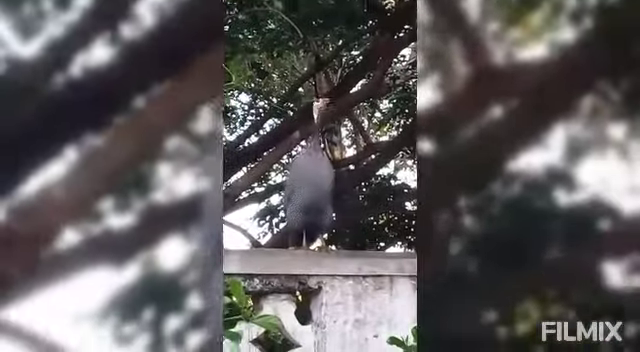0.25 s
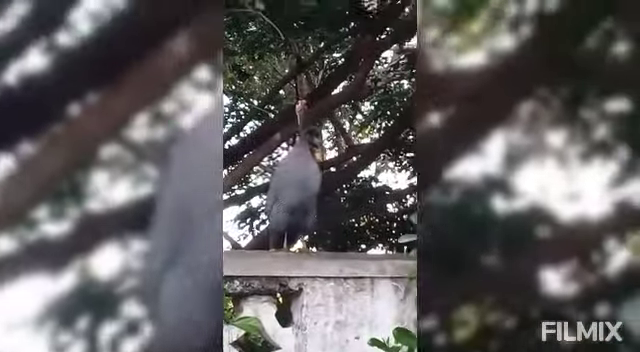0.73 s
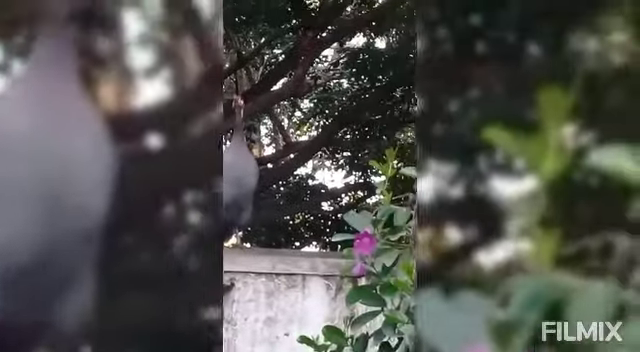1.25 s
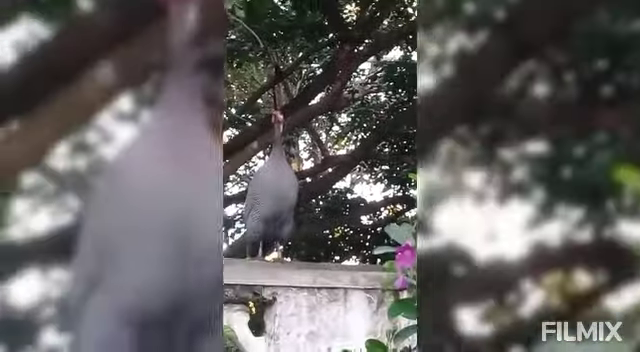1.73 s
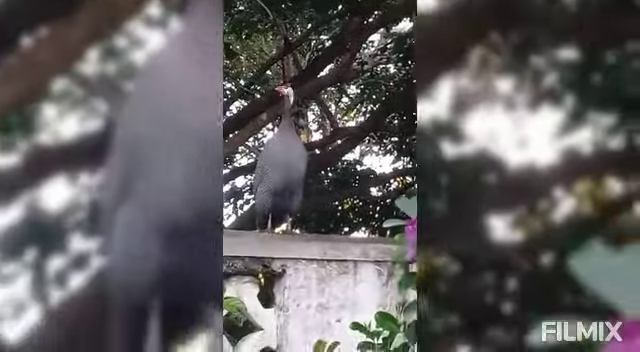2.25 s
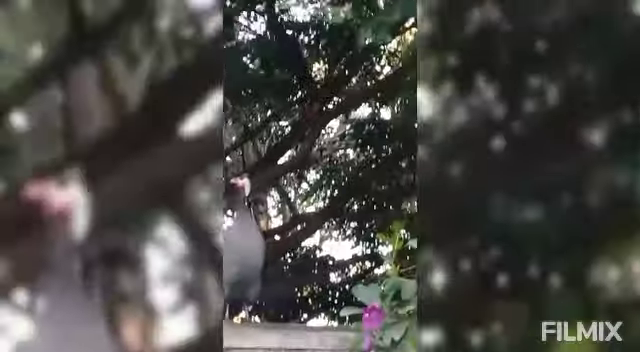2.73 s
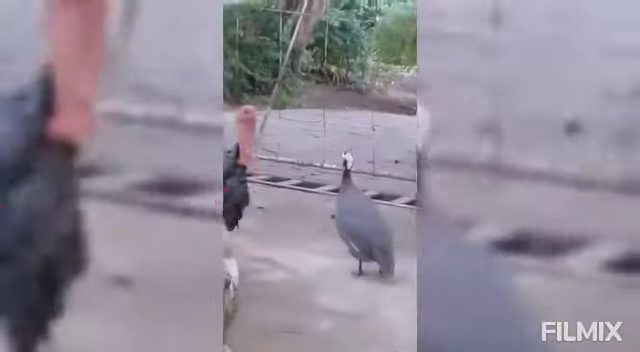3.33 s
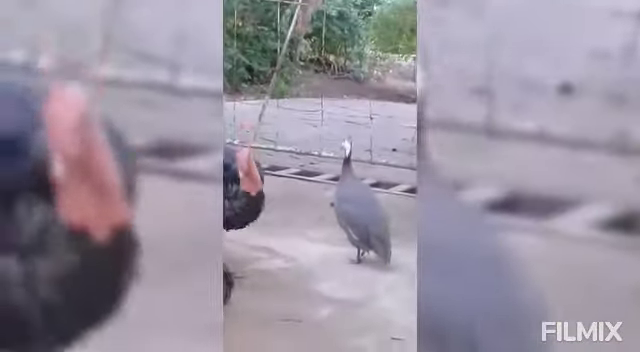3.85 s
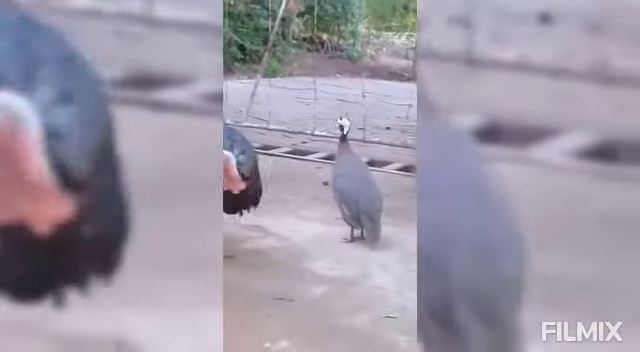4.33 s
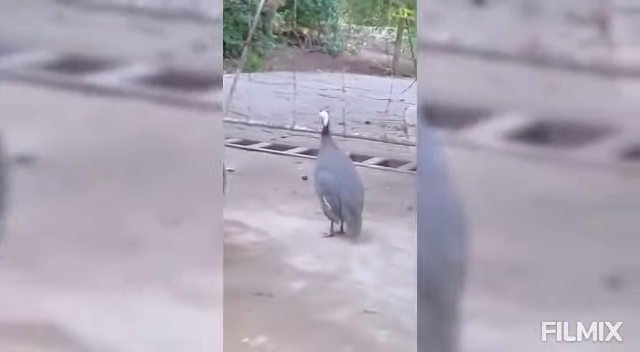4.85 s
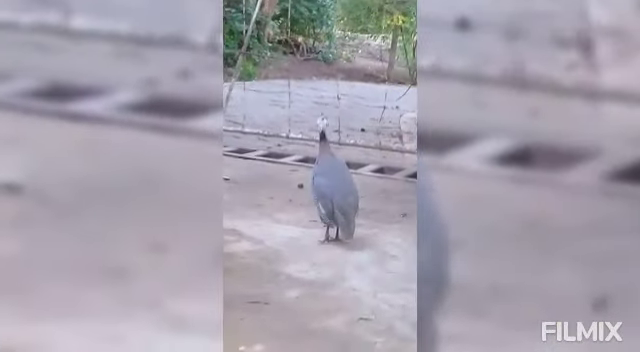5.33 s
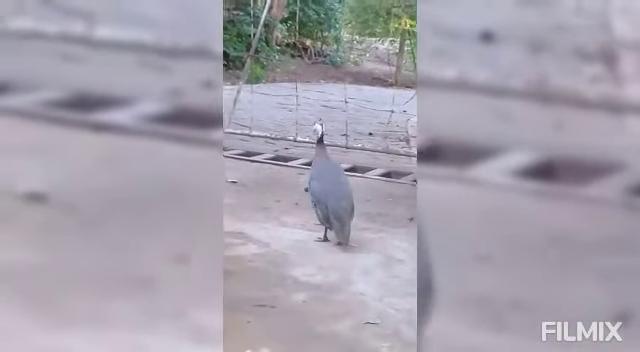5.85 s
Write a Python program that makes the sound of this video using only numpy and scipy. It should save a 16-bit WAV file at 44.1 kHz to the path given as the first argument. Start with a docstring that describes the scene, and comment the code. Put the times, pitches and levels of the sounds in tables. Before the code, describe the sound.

Harsh squealing guineafowl cackles stop abruptly, leaving light scuffs, a sharp click, distant chirps, a few soft turkey yelps and low wind gusts.

```python
"""Over a murmur of leaves, insect hiss and a faint breeze, a guineafowl on a garden wall gives five harsh
cackles: a rasp of pulses buzzing in its throat, most of them led in by a whistled squeal. Gritty scuffs follow,
small birds start whistling and chirping far off, and a sharp click snaps close by. The garden crossfades to a
yard, where a turkey yelps softly among a few light taps. Towards the end, gusts of wind rumble on the
microphone."""
import sys
import numpy as np
from scipy import signal
from scipy.fft import rfft, irfft, next_fast_len
from scipy.io import wavfile
from scipy.ndimage import uniform_filter1d

SR = 44100
rng = np.random.default_rng(int(sys.argv[2]) if len(sys.argv) > 2 else 0)


def transcribe(signal):
    """Save signal, clipped to [-1, 1], as a 16-bit WAV file at the path in sys.argv[1]."""
    frames = np.atleast_2d(signal).T
    limited = np.clip(frames, -1, 1)
    pcm = np.round(limited * 32767).astype(np.int16)
    wavfile.write(sys.argv[1], SR, pcm)


N = 268569
T = np.arange(N) / SR

# EQ curves of the noise beds: f/Hz, level/dB
GARDEN_EQ = [(90, -33.5), (150, -1.5), (339, -0.5), (562, -13.5), (861, -16.5), (1100, -21.5),
             (2230, -13.5), (2930, -21.5), (3920, -36), (4940, -23), (6000, -20), (8350, -35), (15500, -39)]
YARD_EQ = [(90, -41), (150, -4.5), (366, -6), (573, -19), (861, -18), (1320, -22.5), (2460, -18.5),
           (3920, -20.5), (4660, -17), (6000, -20), (9380, -39), (10700, -34.5), (15500, -33)]
INSECT_EQ = [(5800, -25.5), (6600, -0.5), (7300, 1.5), (7750, -4), (8300, -23.5)]
WIND_EQ = [(12, -57.5), (20, -23), (81, 1), (140, -6), (236, -19), (404, -38), (441, -31), (475, -42),
           (700, -55.5), (910, -83), (1540, -120)]
# fader curve of the breeze: t/s, level/dB
BREEZE_FADER = [(0, -62), (3.4, -61), (4.6, -59.5), (5.0, -61.5), (5.4, -53), (5.65, -36), (6.09, -41)]
# gusts on top of the breeze: crest t/s, length/s, level/dB
WIND_GUSTS = [(3.139, 0.077, -49), (3.659, 0.31, -52.5), (3.709, 0.15, -42.5), (3.872, 0.059, -43.5),
              (3.98, 0.18, -52.5), (4.235, 0.1, -45), (4.442, 0.097, -49.5), (4.55, .1, -51.5),
              (4.73, 0.05, -56), (5.084, 0.16, -41.5), (5.178, .1, -46), (5.253, 0.029, -34.5),
              (5.491, 0.041, -35.5), (5.63, 0.19, -35), (5.736, 0.14, -34), (5.952, 0.091, -35.5)]
# the cackles' low, pulsed voice, the first already under way: t/s, length/s, time to crest/s, pitch/Hz,
# level/dB, brightness/dB, throat resonance/Hz, beak resonance/Hz, presence around 4 kHz/dB
RASPS = [(-.08, 0.13, 0.073, 320.5, -17.5, 2.5, 1880, 4420, 4.5),
         (.292, 0.059, .035, 316, -25.5, 1.5, 1500, 4750, -7.5),
         (.458, .16, 0.11, 345.7, -18.5, 3.5, 1874, 4460, 7.5),
         (.888, .064, .038, 322, -26.5, 3.5, 1480, 4624, -9),
         (1.06, .126, .029, 319.1, -19.5, -2, 2071, 4510, -0.5)]
# EQ curve of the throat and open beak: f/Hz, level/dB
THROAT_EQ = [(250, -11.5), (330, -17), (650, -18), (1000, -10.5), (1350, -7.5), (1750, 4), (2500, -8),
             (3400, -10.5), (4500, -14), (5200, -10.5), (6000, -20), (7200, -34.5), (9300, -48),
             (11500, -32.5), (15500, -28)]
# sharp fixed peaks that colour the cackle: f/Hz, width/Hz, lift/dB
CACKLE_PEAKS = [(2080, 130, -1.5), (2099, 110, 2), (2530, 240, 6.5), (2930, 110, 12.5), (3360, 76, 6.5),
                (3960, 34, 15), (5720, 200, 5.5)]
# the high voice opening a cackle, soft creak or loud squeal: t/s, length/s, rise/s, first f/Hz, top f/Hz,
# level/dB, ducking under the rasp/dB, second partial/dB, third partial/dB, scratch/0-1
SQUEAL_NOTES = [(.218, 0.096, .02, 1320, 1392, -45.5, 0.5, 4, 5, 0.7),
                (.29, 0.05, 0.024, 1575, 1540, -28, -13, -19, -13, 1),
                (.449, 0.1, 0.017, 1598, 1655, -18, -18.5, -18, -9, 0.85),
                (.843, 0.044, 0.02, 1060, 1128, -46.5, 2.5, -0.5, -5.5, 0.2),
                (.886, .062, .022, 1420, 1500, -30, -11, -9.5, -11, 0.5),
                (1.036, .13, .036, 1378, 1556, -18, -25, -19, -21, 0.39)]
# slapback from wall and trunks: delay/s, level/dB
SLAP_ECHOES = [(.019, -17), (.052, -21)]
# scuffs on wall and ground: t/s, level/dB, low edge/Hz, high edge/Hz, t60/s
SCUFF_HITS = [(1.288, -46, 1498, 2952, 0.64), (1.301, -54, 272, 1191, 0.48), (1.321, -51, 4303, 6000, 0.27),
              (1.551, -53.5, 318, 850, 0.36), (1.985, -65.5, 904, 4974, 0.99),
              (2.49, -41.5, 713, 2400, 0.38), (2.617, -41, 680, 2440, 0.3), (2.7, -58.5, 401, 904, 1.4),
              (2.822, -54, 1360, 2730, 0.83), (2.886, -49.5, 1330, 3000, 0.25),
              (5.313, -55, 1790, 4430, 0.19), (5.713, -56, 800, 4025, 0.29)]
# light taps: t/s, level/dB, low edge/Hz, high edge/Hz
TAP_HITS = [(4.383, -40.5, 692, 1900), (4.595, -52.5, 2200, 3500), (5.581, -55.5, 696, 2630),
            (5.931, -62, 846, 1200)]
# far birds' held whistles: t/s, length/s, first f/Hz, last f/Hz, level/dB
BIRD_WHISTLES = [(1.717, 0.074, 1758, 1710, -65.5), (2.198, 0.2, 1883, 1800, -61.5),
                 (2.995, .029, 3290, 3330, -53), (3.08, 0.11, 1752, 1700, -69.5),
                 (4.016, .29, 1440, 1564, -61), (4.4, .5, 1546, 1505, -76.5),
                 (4.618, 0.19, 3247, 3526, -59.5)]
# far birds' falling chirps: t/s, length/s, first f/Hz, level/dB
BIRD_CHIRPS = [(2.221, 0.108, 3210, -56.5), (2.445, 0.096, 3055, -52.5), (3.238, .1, 3080, -56.5),
               (3.51, 0.12, 3100, -63), (3.751, .07, 3614, -60.5), (4.2, 0.15, 3000, -57.5),
               (4.372, 0.088, 3860, -55.5), (4.741, 0.095, 3394, -58.5), (5.397, 0.07, 3466, -60)]
# small hard clicks close by: t/s, strike level/dB
CLICK_HITS = [(2.3741, -22), (2.8697, -42.5)]
# modes that a click rings: f/Hz, level/dB, t60/s
CLICK_RING = [(2670, -51, 0.0041), (4700, 4.5, 0.0039), (6780, -1, 0.0052), (12970, -18, .001)]
# turkey yelps: t/s, length/s, pitch/Hz, level/dB, octave partial/dB
TURKEY_YELPS = [(3.812, 0.083, 1063, -44.5, -32), (3.949, .019, 1073, -37, -39),
                (5.151, .095, 1034, -48, -20), (5.285, 0.034, 1059, -44.5, -18),
                (5.358, 0.02, 1046, -44, -11)]


def from_db(db):
    """Decibels to gain."""
    return 10 ** (np.asarray(db) / 20)


def rms_one(x):
    """Normalise to unit rms."""
    return x / np.sqrt(np.mean(x ** 2) + 1e-20)


def ramp(t, length):
    """Linear fade from zero to one."""
    return np.clip(t / length, 0, 1)


def drift(rate_hz):
    """Smooth random modulator of unit rms."""
    r = np.exp(-2 * np.pi * rate_hz / SR)
    return rms_one(signal.lfilter([1], [1, -2 * r, r * r], rng.standard_normal(N + SR))[SR:])


def phase_of(hz):
    """Running phase of a moving pitch."""
    return 2 * np.pi * np.cumsum(hz) / SR


def latest(rows):
    """At every sample: time since the latest cue, its length (cut at the next cue), its other columns."""
    rows = np.array(rows)
    starts = rows[:, 0]
    lengths = np.minimum(rows[:, 1], np.diff(starts, append=np.inf))
    cue = np.maximum(np.searchsorted(starts, T, "right") - 1, 0)
    return [T - starts[cue], lengths[cue], *rows[cue, 2:].T]


def band(x, low_hz, high_hz, order=2):
    """Butterworth band-pass."""
    edges = [low_hz, np.clip(high_hz, low_hz * 1.1, SR * .45)]
    return signal.sosfilt(signal.butter(order, edges, "band", fs=SR, output="sos"), x)


def colour(x, eq):
    """Apply an EQ curve that rolls off beyond its ends; unit rms."""
    hz, db = np.transpose(eq)
    size = next_fast_len(N)
    f = np.maximum(np.fft.rfftfreq(size, 1 / SR), 1)
    gain = from_db(np.interp(np.log(f), np.log(hz), db))
    roll_off = np.minimum(1, np.minimum(f / hz[0], hz[-1] / f)) ** 3
    return rms_one(irfft(rfft(x, size) * gain * roll_off, size)[:N])


def resonate(x, hz, width_hz):
    """A resonance with unity gain at its centre."""
    r = np.exp(-np.pi * width_hz / SR)
    feedback = [1, -2 * r * np.cos(2 * np.pi * hz / SR), r * r]
    return signal.lfilter((1 - r * r) / 2 * np.array([1, 0, -1]), feedback, x)


def glide_resonate(x, hz, width_hz):
    """A swept resonance: shift its centre to zero, smooth, shift back."""
    turn, r = np.exp(1j * phase_of(hz)), np.exp(-np.pi * width_hz / SR)
    return 2 * np.real(turn * signal.lfilter([1 - r], [1, -r], x / turn))


def in_yard(midpoint_s=2.91, fade_s=.5):
    """Crossfade: zero in the garden, one in the yard."""
    return np.clip((T - midpoint_s) / fade_s + .5, 0, 1)


def outdoors(garden_db=-61.5, yard_db=-64):
    """A distant bed of leaves and air, first in the garden, then in the yard."""
    garden = from_db(garden_db) * colour(rng.standard_normal(N), GARDEN_EQ)
    yard = from_db(yard_db) * colour(rng.standard_normal(N), YARD_EQ)
    return np.sqrt(1 - in_yard()) * garden + np.sqrt(in_yard()) * yard


def insects(garden_db=-71, yard_db=-66, throb_db=1.5, period_s=.331, crest_s=4.15, waver_db=2.2):
    """Many far insects merge into one throbbing band of hiss, louder in the yard."""
    db = garden_db + (yard_db - garden_db) * in_yard()
    throb = np.cos(2 * np.pi * (T - crest_s) / period_s)
    return from_db(db + throb_db * throb + waver_db * drift(6)) * colour(rng.standard_normal(N), INSECT_EQ)


def wind(evenness=.94, flutter_db=3):
    """Low turbulence on the microphone: a fluttering breeze with bell-shaped gusts on top."""
    eddies = colour(rng.standard_normal(N), WIND_EQ)
    eddy_power = uniform_filter1d(eddies ** 2, size=SR // 20) + 1e-6
    compressed = rms_one(eddies / eddy_power ** (evenness / 2))
    breeze_db = np.interp(T, *np.transpose(BREEZE_FADER))
    power = from_db(breeze_db + flutter_db * drift(14)) ** 2
    for crest, length, db in WIND_GUSTS:
        bell = np.cos(np.pi * np.clip((T - crest) / length, -.5, .5))
        power += (from_db(db) * bell) ** 2
    return np.sqrt(power) * compressed


def rasp_source(hz, rough, jitter=.02, wander=.014, shimmer=.55, breath_db=-5):
    """The syrinx fires uneven pulses, each with a puff of turbulence; returns sound and phase."""
    phase = phase_of(hz * (1 + jitter * rough * drift(150) + wander * drift(25)))
    samples_since_pulse = np.mod(phase / (2 * np.pi), 1) * SR / hz
    pulses = np.sinc(samples_since_pulse - 2) * (samples_since_pulse < 4)
    pulses = rms_one(pulses - pulses.mean()) * (1 + shimmer * rough * drift(120))
    breath = band(rng.standard_normal(N), 900, 18000, order=1)
    puffs = rms_one(breath * (1 + .5 * np.cos(phase - 1)))
    return pulses + from_db(breath_db) * rough * puffs, phase


def rasp(attack_s=.034, release_s=.033, swell_db_per_s=85.5, sag_db_per_s=116.5):
    """Pulses ring in the guineafowl's throat and beak, brighter with effort; returns sound and phase."""
    t, length, crest, pitch_hz, level_db, bright_db, throat_hz, beak_hz, presence_db = latest(RASPS)
    t = np.minimum(t, length)
    gate = ramp(t, attack_s) * ramp(length - t, release_s)
    effort_db = -np.maximum(swell_db_per_s * (crest - t), sag_db_per_s * (t - crest))
    db = level_db + effort_db
    scoop = .05 * np.exp(-t / .022)   # pitch and throat start low, the beak high, then all settle
    droop = 3.9 * np.maximum(t - .66 * length, 0)   # the pitch falls over the last third
    rough = 1 - .5 * ramp(np.minimum(t, length - t), .055)   # roughest at both ends
    pulses, phase = rasp_source(pitch_hz * (1 - scoop - droop), rough)
    voice = colour(pulses, THROAT_EQ)
    voice += sum((from_db(lift) - 1) * resonate(voice, hz, width) for hz, width, lift in CACKLE_PEAKS)
    voice += from_db(-2) * glide_resonate(voice, throat_hz * (1 - scoop), width_hz=220)
    voice += (from_db(presence_db + .62 * effort_db) - 1) * resonate(voice, 4000, width_hz=900)
    voice = scatter(voice * ramp(T, .002), spread_s=.012)
    body = signal.sosfiltfilt(signal.butter(4, 3500, fs=SR, output="sos"), voice)
    treble = voice - body
    treble += from_db(13) * glide_resonate(treble, beak_hz * (1 + scoop), width_hz=110)
    sizzle = signal.sosfiltfilt(signal.butter(4, 8000, "high", fs=SR, output="sos"), treble)
    sizzle_db = np.interp(db, [-40, -22], [-9, 1])   # only hard blowing reaches the very top
    treble += sizzle * (from_db(sizzle_db) * gate - 1)
    treble *= from_db(bright_db + .56 * effort_db)
    body_rms = np.sqrt(uniform_filter1d(body ** 2, size=SR // 50) + 1e-9)
    return gate * from_db(db) * (body + treble) / body_rms, phase


def scatter(x, spread_s):
    """Nearby wall and branches delay each frequency by its own path, smearing the pulses."""
    size = next_fast_len(N + SR // 8)
    f = np.fft.rfftfreq(size, 1 / SR)
    knots_hz = np.linspace(0, SR / 2, 160)
    delay = np.interp(f, knots_hz, spread_s * rng.random(len(knots_hz)))
    return irfft(rfft(x, size) * np.exp(-2j * np.pi * np.cumsum(delay) * f[1]), size)[:N]


def slapback(x):
    """Single reflections from wall and trunks make the tails uneven."""
    return sum(from_db(db) * np.interp(T - delay, T, x, left=0) for delay, db in SLAP_ECHOES)


def reverb(x, t60, treble_t60, predelay_s):
    """Walls and trees return a dense tail whose treble dies first."""
    t = T[:SR]
    white = rng.standard_normal(SR)
    lows = band(white, 150, 2800) * from_db(-60 * t / t60)
    highs = band(white[::-1], 4000, 15000) * from_db(-60 * t / treble_t60)
    tail = (lows + highs) * ramp(t - predelay_s, predelay_s)
    return signal.fftconvolve(x, tail / np.sqrt(SR * t60 / (2 * np.log(1000))))[:N]


def squeal(rasp_phase, jitter=.011, throb=.32, pull=.22, duck_s=.026, release_s=.008):
    """The other side of the syrinx whistles, sliding as it swells, then ducks as the pulses shake it."""
    t, length, rise, first_hz, top_hz, level_db, duck_db, second_db, third_db, scratch = latest(SQUEAL_NOTES)
    risen = ramp(t, rise)
    gate = risen ** 1.1 * ramp(length - t, release_s)
    ducked = 1 - np.exp(-np.maximum(t - rise, 0) / duck_s)
    db = level_db + duck_db * ducked
    croak = np.interp(db, [-52, -25], [1.7, 1])   # blown softly, the tone is less steady
    shake = np.maximum(croak * risen, 2.5 * ducked)   # the pitch breaks up as the rasp takes over
    hz = first_hz + (top_hz - first_hz) * risen ** 2
    phase = phase_of(hz * (1 + jitter * shake * drift(270))) + pull * np.sin(rasp_phase)
    first, second, third, fourth = (np.sin(k * phase) for k in (1, 2, 3, 4))
    hoarse = rms_one(band(rng.standard_normal(N), 2500, 3400) * from_db(4 * drift(120)))
    octave = np.sqrt(1 - scratch ** 2) * (second + from_db(-16.5) * fourth) + scratch * hoarse
    lead_db = 580.5 * rise * (1 - risen)   # the octave leads, then fades during the rise
    tone = first + from_db(second_db + lead_db) * octave + from_db(third_db) * third
    tremolo = 1 + throb * np.cos(rasp_phase)
    return np.sqrt(2) * gate * from_db(db + croak * drift(150)) * tone * tremolo


def scuffs(grain_db=3.5, hiss_db=-21, scuff_rise_s=.008, tap_rise_s=.001, tap_t60=.055):
    """Hollow bursts of gritty friction under a thin hiss; taps are the briefest."""
    out = np.zeros(N)
    bursts = [(*row, scuff_rise_s) for row in SCUFF_HITS]
    bursts += [(*row, tap_t60, tap_rise_s) for row in TAP_HITS]
    for start, db, low_hz, high_hz, t60, rise in bursts:
        at = int(start * SR)
        t = T[:min(SR // 2, N - at)]
        grit = rng.standard_normal(len(t)) * from_db(grain_db * rng.standard_normal(len(t)))
        envelope = ramp(t, rise) * from_db(-60 * np.maximum(t - rise, 0) / t60)
        scrape = rms_one(band(grit, low_hz, high_hz, order=4))
        hiss = from_db(hiss_db) * rms_one(band(grit, 4600, 6350))
        out[at:at + len(t)] += from_db(db) * envelope * (scrape + hiss)
    return out + resonate(out, 886, width_hz=138.6)


def far_birds(waver=.036, fall_octaves_per_s=4):
    """Each whistle or chirp swells and fades as its pitch slides; the high ones quaver most."""
    out, quaver = np.zeros(N), waver * drift(190)
    chirps = [(start, length, hz, hz / 2 ** (fall_octaves_per_s * length), db)
              for start, length, hz, db in BIRD_CHIRPS]
    for start, length, first_hz, last_hz, db in BIRD_WHISTLES + chirps:
        on = (T >= start) & (T < start + length)
        progress = (T[on] - start) / length
        hz = first_hz + (last_hz - first_hz) * progress
        hz *= 1 + quaver[on] * (first_hz / 3000) ** 1.7
        out[on] += from_db(db) * np.sqrt(2 * np.sin(np.pi * progress)) * np.sin(phase_of(hz))
    return out


def clicks(rub_db=-39, rub_s=.029, thump_db=-15, thump_hz=95.2, thump_t60=.13):
    """A snap, then a brief rub through the same modes, over a dull thump."""
    strikes, t = np.zeros(N), T[:SR // 8]
    for start, db in CLICK_HITS:
        strikes[int(start * SR)] = from_db(db)
    contact = from_db(rub_db) * rng.standard_normal(len(t)) * np.sin(np.pi * ramp(t, rub_s))
    contact[0] = 1   # the snap
    ring = sum(from_db(db - 60 * t / t60) * np.sin(2 * np.pi * hz * t) for hz, db, t60 in CLICK_RING)
    thump = from_db(thump_db - 60 * t / thump_t60) * np.sin(2 * np.pi * thump_hz * t)
    click = signal.fftconvolve(contact, ring)[:len(t)] + thump
    return signal.fftconvolve(strikes, click)[:N]


def turkey(attack_s=.012, release_s=.0049, jitter=.022, shimmer_db=2, flick_hz=157, flick_s=.0061):
    """Soft, nearly pure yelps that sink in the middle and flick upwards at the end."""
    t, length, pitch_hz, db, octave_db = latest(TURKEY_YELPS)
    t = np.minimum(t, length)
    gate = ramp(t, attack_s) * ramp(length - t, release_s)
    dip_db = 92.5 * length * np.sin(np.pi * t / length) ** 4   # longer yelps sink further
    hz = pitch_hz - 4 * dip_db + flick_hz * np.exp((t - length) / flick_s)
    phase = phase_of(hz * (1 + jitter * drift(200)))
    tone = np.sin(phase) + from_db(octave_db) * np.sin(2 * phase)
    return np.sqrt(2) * gate * from_db(db - dip_db + shimmer_db * drift(130)) * tone


def scene():
    """The mono mix: cackles with a strong echoing tail, scuffs and yelps drier, far birds mostly reverb."""
    buzz, rasp_phase = rasp()
    guineafowl = buzz + squeal(rasp_phase)
    grit = scuffs()
    yelps = turkey()
    send = from_db(.5) * guineafowl + from_db(-5) * grit + from_db(-8) * yelps
    wet = reverb(send, t60=.37, treble_t60=.32, predelay_s=.0016)
    near = guineafowl + slapback(guineafowl) + grit + yelps + wet
    birds = far_birds()
    far = from_db(-8) * birds + from_db(-2) * reverb(birds, t60=.54, treble_t60=.43, predelay_s=.0034)
    return (near + far + clicks() + wind() + outdoors() + insects())[None]


def record(dry):
    """A steep low-pass at 15.8 kHz on the master."""
    return signal.sosfilt(signal.ellip(10, .1, 80, 15800, fs=SR, output="sos"), dry)


dry = scene()
out = record(dry)
transcribe(out)
```